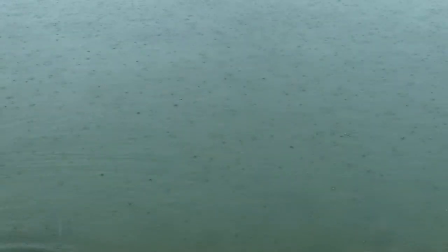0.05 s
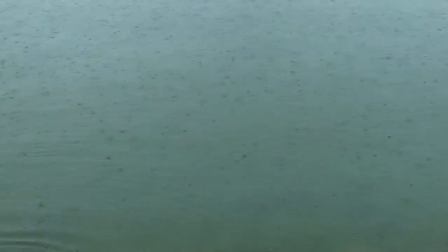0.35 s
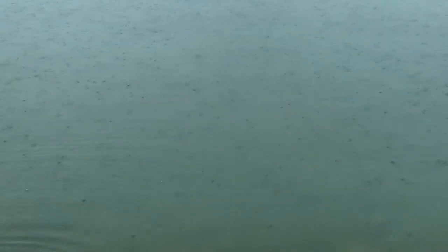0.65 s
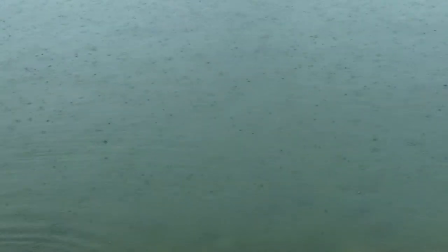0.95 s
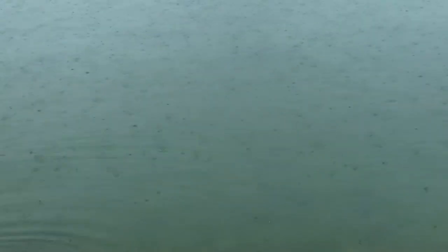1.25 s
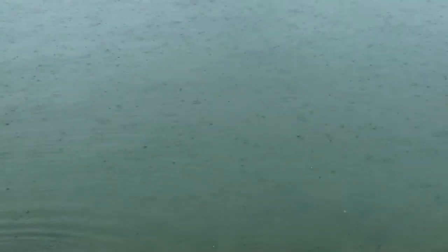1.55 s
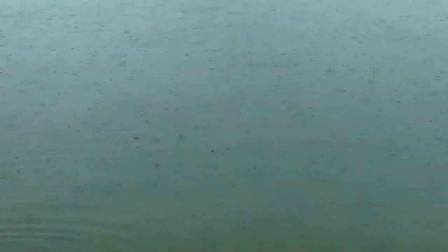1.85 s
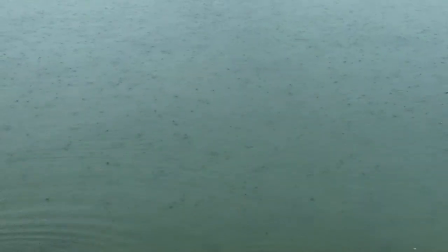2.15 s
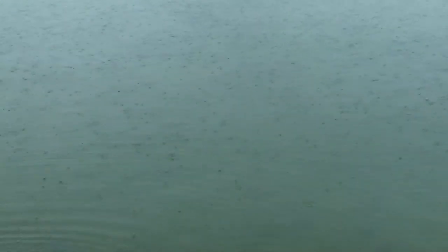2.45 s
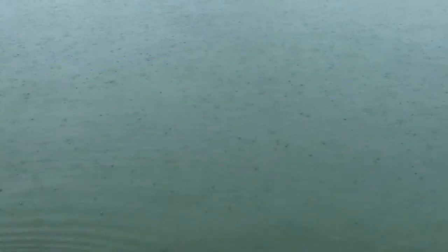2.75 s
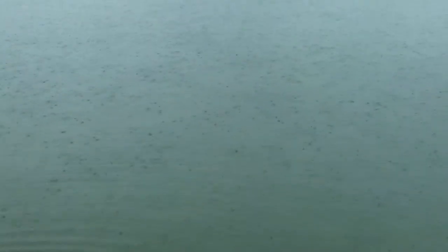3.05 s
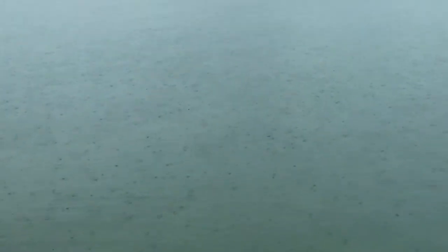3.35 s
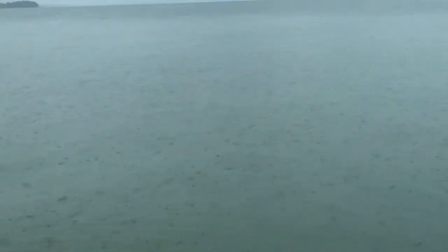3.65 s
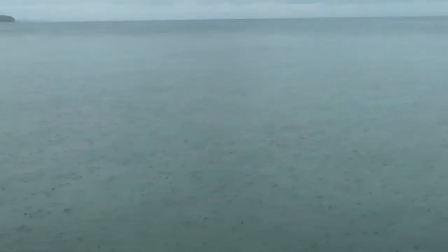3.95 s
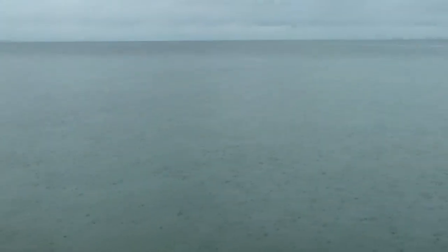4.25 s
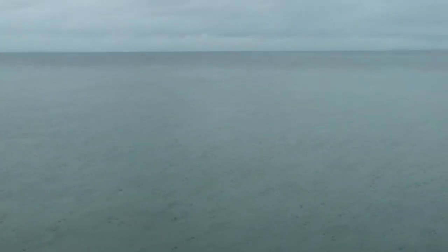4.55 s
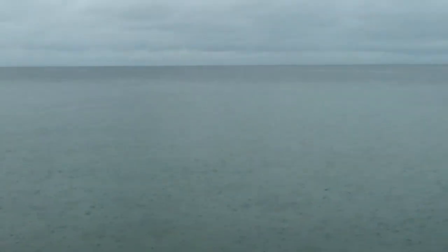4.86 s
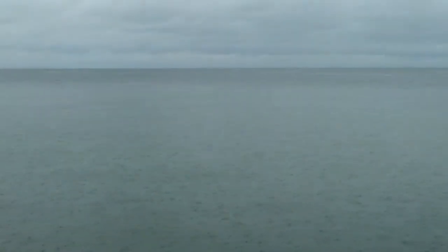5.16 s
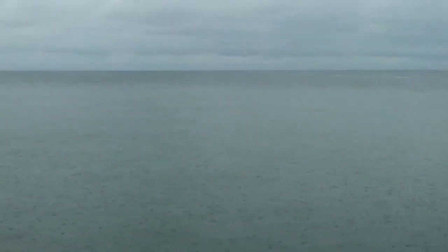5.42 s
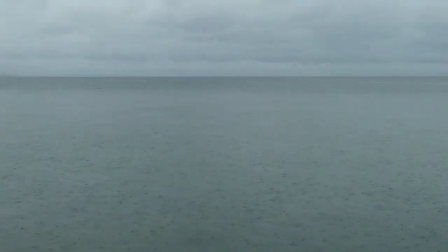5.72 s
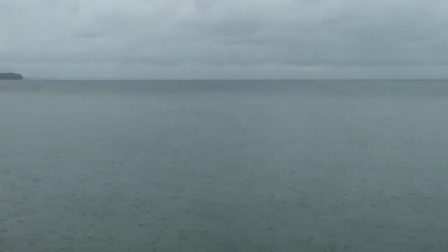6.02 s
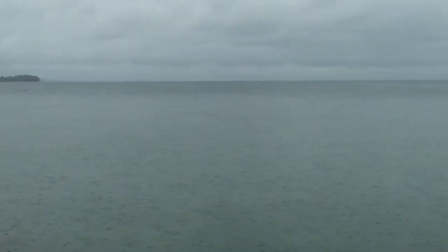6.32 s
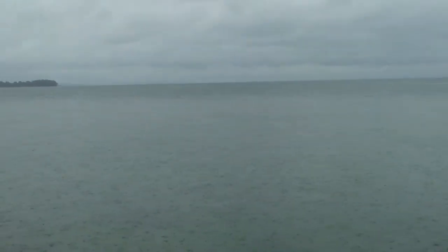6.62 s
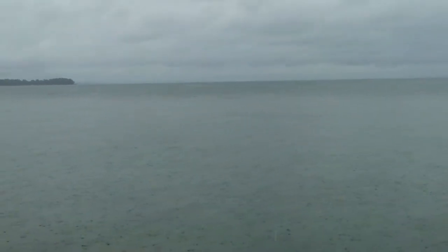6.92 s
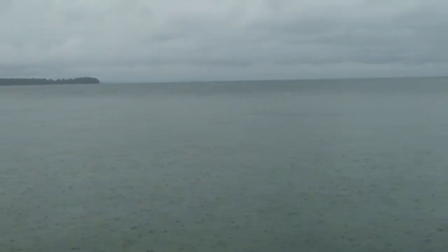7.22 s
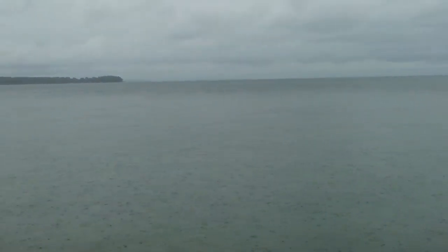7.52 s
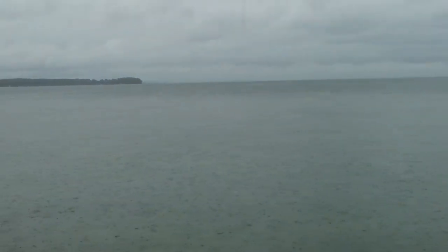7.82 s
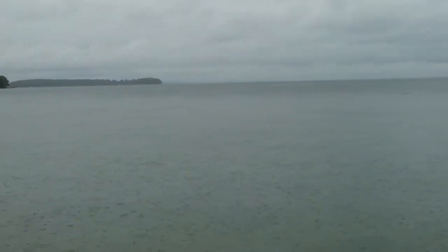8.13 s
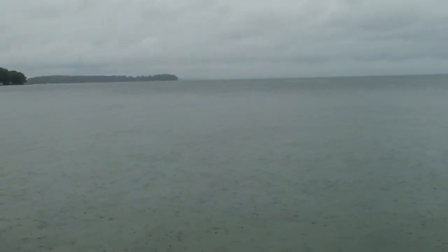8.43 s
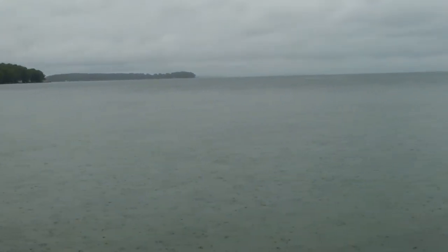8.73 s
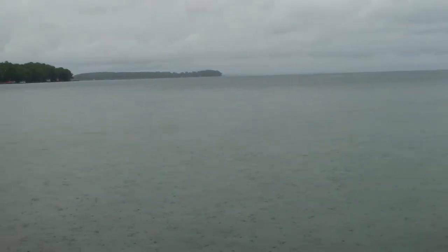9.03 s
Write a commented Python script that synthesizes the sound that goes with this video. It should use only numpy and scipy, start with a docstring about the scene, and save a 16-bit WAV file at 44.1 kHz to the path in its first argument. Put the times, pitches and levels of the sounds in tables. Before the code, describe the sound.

Heard from a lake shore through a small hand-held microphone, rain makes a continuous, slightly thin patter on the water. Crisp close drops and small ringing plops stand out at random. Beneath them are a low rumble, gentle wind buffeting and a faint fluttering camera throb. A brief cluster of grip bumps comes just before the middle, and one small tap near the end, while the rain stays even.

```python
"""Steady rain on a calm lake

Far drops merge into a wash; nearer ones tick and now and then trap a ringing bubble. The rain is heard
from the shore through a small hand-held camera, whose microphone port rings near 4.5 kHz. Underneath
sit light wind, a low rumble, a few handling bumps and the camera's own hiss and soft frame-rate throb."""
import sys
import numpy as np
from scipy import signal
from scipy.fft import rfft, irfft, next_fast_len
from scipy.io import wavfile

SR = 44100
rng = np.random.default_rng(int(sys.argv[2]) if len(sys.argv) > 2 else 0)


def output_pcm(signal):
    """Save a mono or channel-first signal as 16-bit PCM at the path in sys.argv[1].

    Samples are clipped to [-1, 1] before scaling.
    """
    pcm = np.clip(np.atleast_2d(signal).T, -1, 1) * 32767
    wavfile.write(sys.argv[1], SR, np.round(pcm).astype(np.int16))


N = 409248
TIME = np.arange(N) / SR


def from_db(db):
    """Decibels to gain."""
    return 10 ** (np.asarray(db) / 20)


def rms_one(x):
    """Scale to unit rms."""
    return x / np.sqrt(np.mean(x ** 2) + 1e-20)


def peak_one(x):
    """Scale to unit peak."""
    return x / (np.abs(x).max() + 1e-20)


def add(out, s, sound):
    """Mix a short sound in at s seconds."""
    start = int(np.clip(s * SR, 0, N - 1))
    out[start:start + len(sound)] += sound[:N - start]


def low_pass(x, hz, order=2):
    """Butterworth low-pass."""
    return signal.sosfilt(signal.butter(order, hz, fs=SR, output="sos"), x)


def noise(colour):
    """Unit-rms noise shaped by rows of (frequency [Hz], relative level [dB])."""
    hz, db = np.transpose(colour)
    size = next_fast_len(N)
    bin_hz = np.maximum(np.arange(size // 2 + 1) * SR / size, 1)
    gain = from_db(np.interp(np.log(bin_hz), np.log(hz), db))
    return rms_one(irfft(rfft(rng.standard_normal(size)) * gain, size)[:N])


def pole_pair(hz, width_hz):
    """Feedback coefficients of one damped mode."""
    radius = np.exp(-np.pi * width_hz / SR)
    return [1, -2 * radius * np.cos(2 * np.pi * hz / SR), radius * radius]


def resonance(x, hz, width_hz):
    """Resonant band-pass with unity gain at its peak."""
    poles = pole_pair(hz, width_hz)
    return signal.lfilter(np.array([1, 0, -1]) * (1 - poles[2]) / 2, poles, x + 1e-18)


def fade(t, t60):
    """Exponential decay, 60 dB down after t60 seconds."""
    return np.exp(-np.log(1000) * t / t60)


def mic_port(x):
    """The cavity before the microphone passes the lows, rings, and shuts out most of the top."""
    # weak upper modes of the cavity: (frequency [Hz], width [Hz], gain [dB])
    upper_modes = [(6900, 400, -7), (8060, 460, -4), (8750, 560, -19.5)]
    poles = pole_pair(hz=4563, width_hz=555)
    ringing = signal.lfilter([sum(poles)], poles, x + 1e-18)
    leak = sum(from_db(db) * resonance(x, hz, width) for hz, width, db in upper_modes)
    return low_pass(ringing, hz=5330, order=5) + leak


def far_wash():
    """Countless far drops blur into an even bed of noise."""
    # colour of distant rain ahead of the port: (frequency [Hz], relative level [dB])
    colour = [(100, 8), (250, 4.5), (500, 4), (1000, 1), (1600, -1), (2600, -3), (3600, -7.5),
              (4600, -11.5), (7000, -7), (16000, -25)]
    return rms_one(mic_port(noise(colour)))


def impacts(per_s, reach):
    """Drops land evenly out to about reach times the nearest distance; each falls off as 1 / distance."""
    chance, place, sign = rng.random((3, N))
    distance = np.sqrt(1 + place * reach ** 2)
    return (chance < per_s / SR) * np.sign(2 * sign - 1) / distance


def patter(per_s, reach, low_cut_hz, spray_db, spray_t60):
    """Each impact is a sharp pressure spike with a short tail of spray."""
    clicks = impacts(per_s, reach)
    power_decay = fade(1 / SR, spray_t60) ** 2
    spray_power = signal.lfilter([1], [1, -power_decay], clicks ** 2 + 1e-18)
    spray = from_db(spray_db) * np.sqrt(spray_power) * rng.standard_normal(N)
    low_cut = signal.butter(2, low_cut_hz, "high", fs=SR, output="sos")
    return rms_one(mic_port(signal.sosfilt(low_cut, clicks + spray)))


def crisp_drops(per_s, reach, hz, width_hz):
    """Drops a few metres out stand clear of the patter as single dry clicks."""
    return peak_one(mic_port(resonance(impacts(per_s, reach), hz, width_hz)))


def bubbles(per_s, reach, low_hz, high_hz, q, sizes=28):
    """Small trapped bubbles ring briefly, each at the pitch of its size."""
    clicks = impacts(per_s, reach)
    size = rng.integers(0, sizes, N)
    pitches = np.linspace(low_hz, high_hz, sizes)
    rings = sum(resonance(clicks * (size == k), hz, hz / q) for k, hz in enumerate(pitches))
    return rms_one(mic_port(rings))


def wind(rise_s, fall_s):
    """A breeze buffets the microphone; bell-shaped gusts add their power to it."""
    # the breeze, with one lull: (time [s], level [dB])
    breeze = [(0, -51), (7.1, -50.5), (7.6, -60), (8.3, -56.5), (8.8, -47.5)]
    # gust crests: (time [s], level [dB])
    gusts = [(0.4, -45), (1.03, -44.5), (1.56, -44.5), (2.2, -44), (3.46, -44), (3.75, -46), (3.95, -41.5),
             (4.4, -45), (5.68, -56), (6.7, -46)]
    # colour of the buffeting: (frequency [Hz], relative level [dB])
    buffet = [(8, -13), (20, 0), (45, -9), (80, -16.5), (200, -31.5), (1000, -56.5)]
    power = from_db(np.interp(TIME, *np.transpose(breeze))) ** 2
    for s, db in gusts:
        from_crest = (TIME - s) / np.where(TIME < s, rise_s, fall_s)
        power += from_db(db) ** 2 * np.exp(-from_crest ** 2)
    return np.sqrt(power) * noise(buffet)


def low_rumble():
    """A steady low rumble lies under the rain."""
    # colour of the rumble: (frequency [Hz], relative level [dB])
    colour = [(30, -4.5), (70, 2.5), (120, 0.5), (220, -6), (400, -14), (1000, -26.5), (4000, -68)]
    return noise(colour)


def camera_hiss():
    """The camera's own noise floor is almost white."""
    # colour of the hiss: (frequency [Hz], relative level [dB])
    colour = [(100, 0), (5000, 0.44), (9000, 0.23), (12000, -1.1), (16000, -1)]
    return noise(colour)


def camera_throb(frame_hz, width_s, uneven_db):
    """The camera's mechanism nudges the microphone once a frame with a soft pointed pulse."""
    # runs of pulses: (start [s], end [s], typical peak [dB])
    runs = [(0.0296, 4.0, -36), (4.110, 9.28, -36.5)]
    out, t = np.zeros(N), TIME[:SR // 30]
    centre = t.mean()
    pulse = np.exp(-np.abs(t - centre) / width_s)
    for start, end, db in runs:
        count = int((end - start) * frame_hz) + 1
        for s in start + np.arange(count) / frame_hz:
            add(out, s - centre, from_db(db + uneven_db * rng.standard_normal()) * pulse)
    return out - out.mean()


def stray_drops(per_s=6.0, db=-33.0, spread_db=0.5, hz=3850, spread_octaves=0.32):
    """Fairly close drops fall at random: rows of (time [s], relative level [dB], click centre [Hz])."""
    times = TIME[rng.random(N) < per_s / SR]
    scatter = rng.standard_normal((len(times), 2))
    return [(s, db + spread_db * loud, hz * 2 ** (spread_octaves * small))
            for s, (loud, small) in zip(times, scatter)]


def near_ticks(width_hz, snap_db, spray_db, spray_t60, ring_db, ring_width_hz):
    """A close drop clicks and rings, lower if bigger, with a bright snap and a trail of faint spray."""
    # the nearest drops: (time [s], relative level [dB], click centre [Hz])
    nearest = [(0.0553, -24, 3380), (0.4713, -26.5, 3930), (0.795, -28, 3150), (1.2048, -27.5, 4500),
               (1.65, -33.5, 3900), (1.81, -30.5, 3960), (1.8177, -26, 5200), (1.9241, -29, 3100),
               (2.5265, -27.5, 3340), (2.647, -30, 3890), (3.2007, -29, 4160), (3.3032, -29, 4400),
               (3.609, -27.5, 4530), (3.636, -30, 3960), (3.6464, -21.5, 4160), (4.1758, -28, 3880),
               (5.7404, -32, 3910), (5.8257, -30, 4400), (5.8718, -29.5, 3380), (6.8847, -28.5, 4600),
               (7.7598, -28.5, 4700), (7.918, -25.5, 3830), (7.9636, -34, 4330), (8.6241, -29.5, 3870),
               (8.7232, -31.5, 4570), (8.9865, -26.5, 4720), (9.1198, -30.5, 3700)]
    out, t = np.zeros(N), TIME[:SR // 25]
    for s, db, hz in nearest + stray_drops():
        spray = from_db(spray_db) * rng.standard_normal(len(t)) * fade(t, spray_t60)
        splash = (t == 0) + spray
        click = resonance(splash, hz, width_hz)
        snap = from_db(snap_db) * resonance(splash, hz=6400, width_hz=3000)
        ring = from_db(ring_db) * resonance(splash, hz, ring_width_hz)
        add(out, s, from_db(db) * peak_one(mic_port(click + snap + ring)))
    return out


def near_plops(rise_per_s, splash_db, t60):
    """A close bubble rings and lifts slightly in pitch, inside a splash of the same register."""
    # close drops that trap a bubble: (time [s], relative level [dB], starting pitch [Hz])
    plops = [(0.162, -36, 3480), (0.262, -39.5, 2300), (0.471, -40, 854), (1.283, -45, 1720),
             (1.839, -37.5, 1680), (2.974, -38, 3260), (2.994, -33, 1770), (2.995, -37, 2600),
             (3.079, -38.5, 2340), (3.635, -35, 3640), (3.649, -37, 2940), (6.019, -49, 1070),
             (6.272, -41, 2400), (6.534, -40.5, 2340), (7.158, -40.5, 2130), (8.329, -44.5, 1150),
             (8.432, -33, 2770)]
    out, t = np.zeros(N), TIME[:SR // 12]
    for s, db, hz in plops:
        tone = np.sin(2 * np.pi * hz * (t + rise_per_s * t * t / 2))
        band = resonance(rng.standard_normal(len(t)), hz, hz / 3)
        splash = from_db(splash_db) * rms_one(resonance(band, hz, hz / 3))
        plop = (tone + splash) * fade(t, t60)
        add(out, s, from_db(db) * peak_one(mic_port(plop)))
    return out


def handling(thud_hz, thud_t60, knock_hz, knock_db):
    """A shifting grip gives a low thud, a hollow knock and a short rub that leaks through the case."""
    # fingers on the camera body: (time [s], thud [dB], rub [dB], rub t60 [s], relative case leak [dB])
    touches = [(3.734, -34.5, -35, .2, 0.5), (3.761, -35.5, -47, 0.14, 11), (3.831, -57, -38, .012, 5),
               (3.919, -30.5, -33, 0.032, -15), (4.071, -34, -35, 0.0064, 1), (4.221, -52, -34, .015, 4),
               (8.828, -48, -28.5, 0.0033, -15)]
    out, t = np.zeros(N), TIME[:SR // 5]
    thud = peak_one(low_pass(np.cos(2 * np.pi * thud_hz * t) * fade(t, thud_t60), hz=328))
    for s, thud_db, rub_db, rub_t60, case_db in touches:
        rub = rng.standard_normal(len(t)) * fade(t, rub_t60)
        hollow = resonance(rub, knock_hz, width_hz=500)
        knock = from_db(knock_db) * peak_one(low_pass(hollow, hz=1050, order=4))
        scrape = resonance(rub, hz=6500, width_hz=3300)
        through_case = from_db(case_db) * low_pass(scrape, hz=8700, order=4) / 2
        through_port = mic_port(low_pass(rub, hz=1800, order=1))
        add(out, s, from_db(thud_db) * (thud + knock))
        add(out, s, from_db(rub_db) * peak_one(through_port + through_case))
    return out


def scene():
    """Rain from far to near, over wind and the camera's own noises, in mono."""
    wash = from_db(-2.5) * far_wash()
    drops = from_db(-5.5) * patter(per_s=1300, reach=11.5, low_cut_hz=2400, spray_db=-24, spray_t60=0.032)
    clicks = from_db(13) * crisp_drops(per_s=98, reach=2.6, hz=4660, width_hz=2500)
    fizz = from_db(-9) * bubbles(per_s=260, reach=3.9, low_hz=2120, high_hz=3590, q=15)
    plinks = from_db(-8.5) * bubbles(per_s=51, reach=2.2, low_hz=3580, high_hz=5200, q=28)
    rain = from_db(-49.5) * (wash + drops + clicks + fizz + plinks)
    ticks = from_db(2) * near_ticks(width_hz=2000, snap_db=-3.5, spray_db=-27, spray_t60=0.033,
                                    ring_db=-10, ring_width_hz=400)
    plops = from_db(1.5) * near_plops(rise_per_s=2.0, splash_db=-5, t60=0.036)
    bumps = handling(thud_hz=62.5, thud_t60=0.066, knock_hz=820, knock_db=-10)
    air = wind(rise_s=0.1, fall_s=0.085)
    rumble = from_db(-56) * low_rumble()
    throb = camera_throb(frame_hz=29.97, width_s=0.0019, uneven_db=0.5)
    hiss = from_db(-59) * camera_hiss()
    return (rain + ticks + plops + bumps + air + rumble + throb + hiss)[None]


def record(dry):
    """A steep low-pass shaves off the very top."""
    cutoff_hz = 15740
    return signal.sosfilt(signal.ellip(16, .1, 70, cutoff_hz, fs=SR, output="sos"), dry)


dry = scene()
out = record(dry)
output_pcm(out)
```